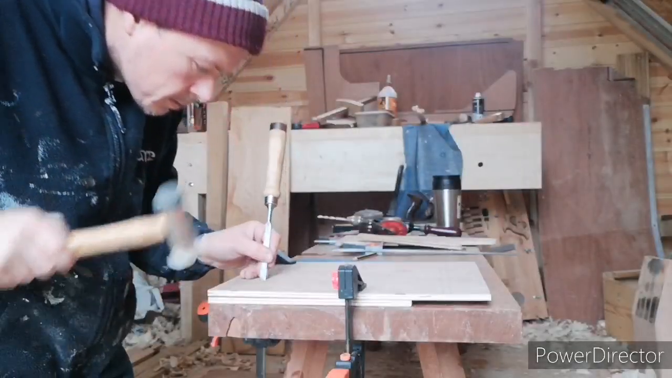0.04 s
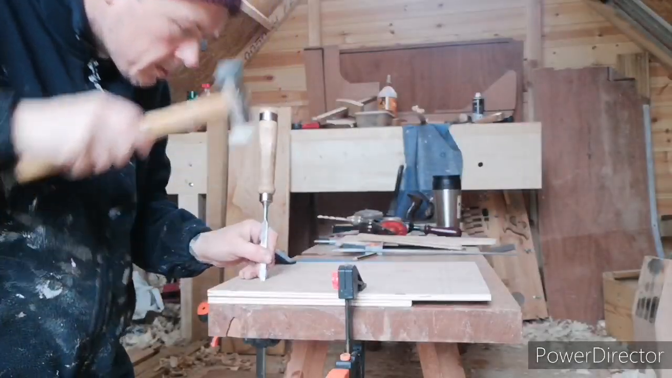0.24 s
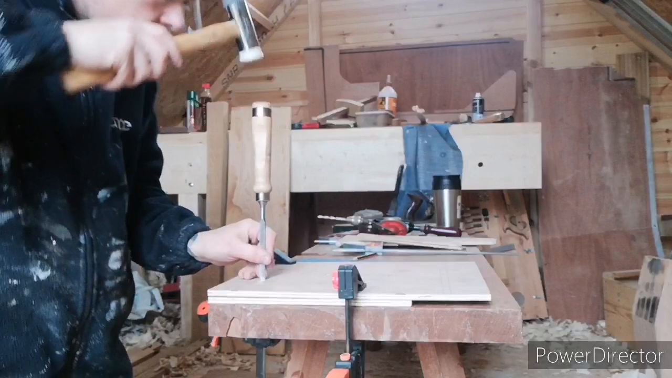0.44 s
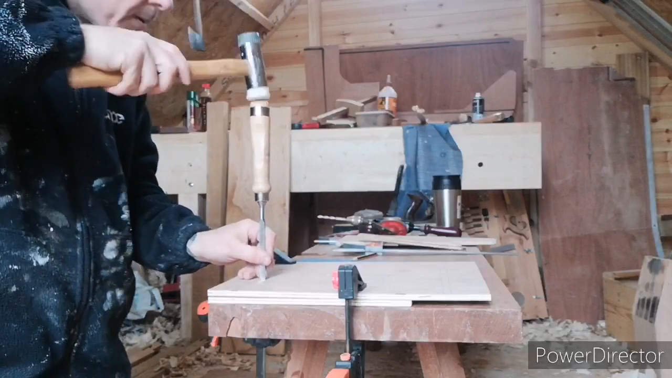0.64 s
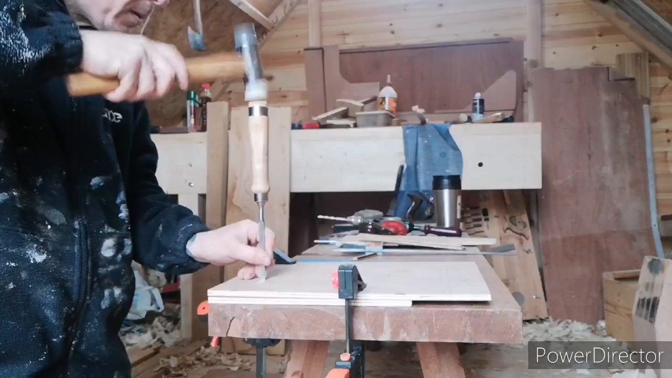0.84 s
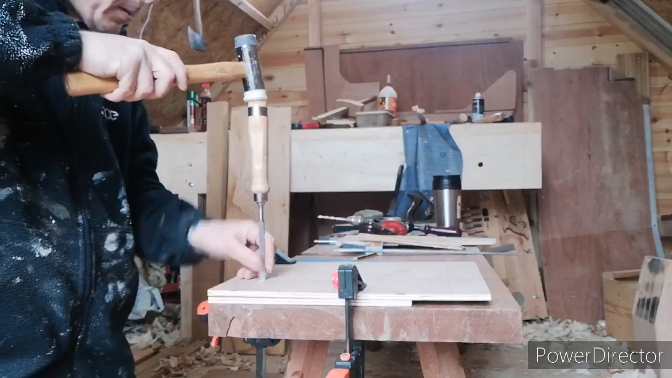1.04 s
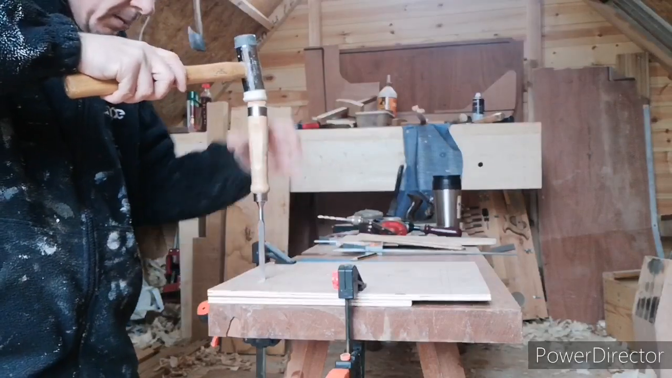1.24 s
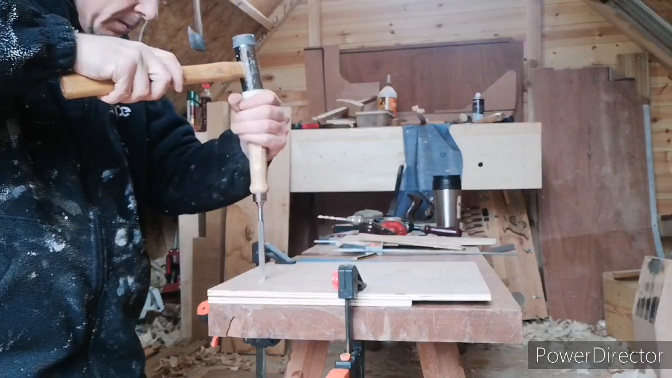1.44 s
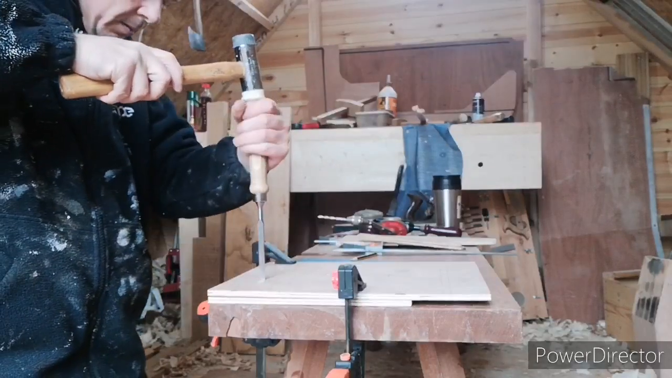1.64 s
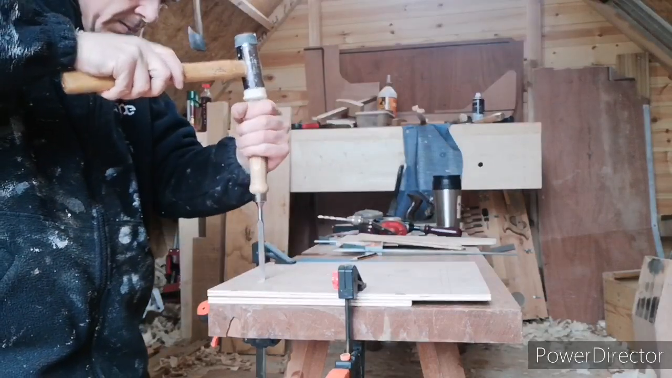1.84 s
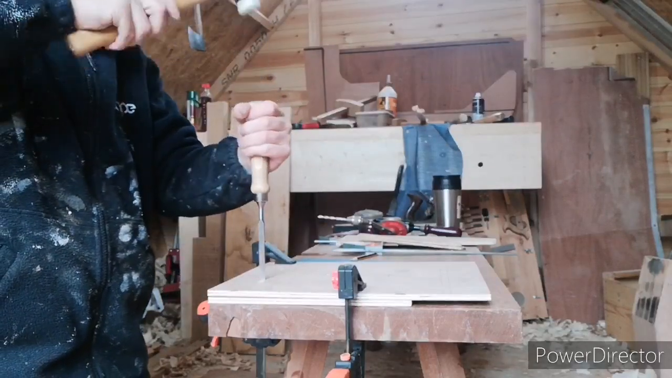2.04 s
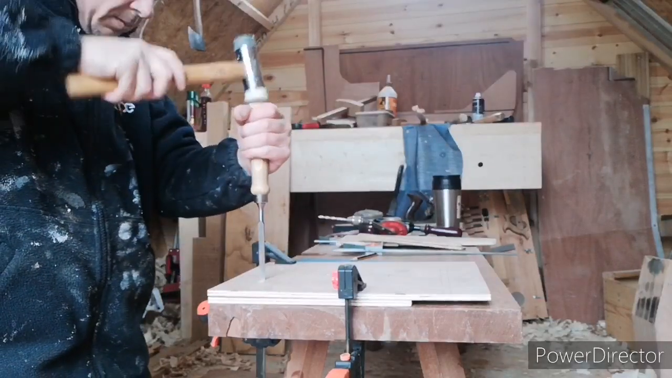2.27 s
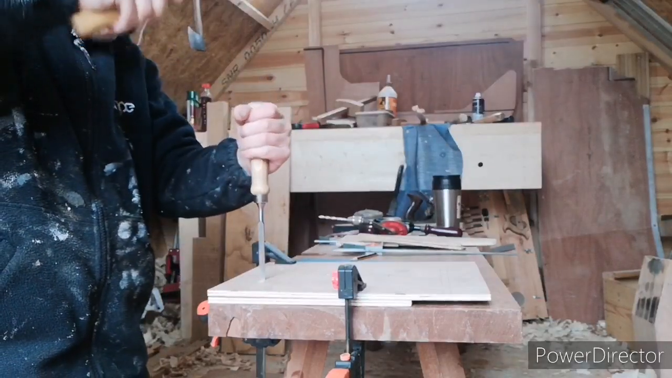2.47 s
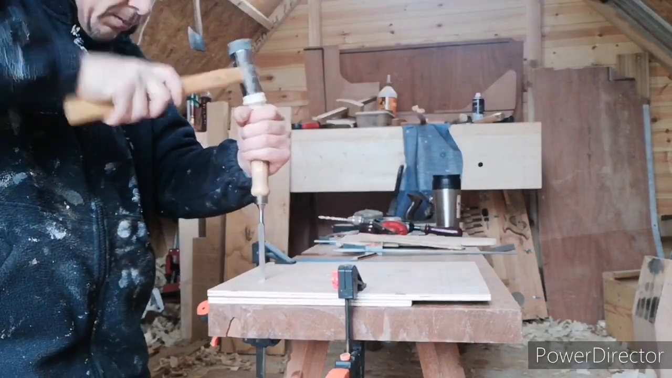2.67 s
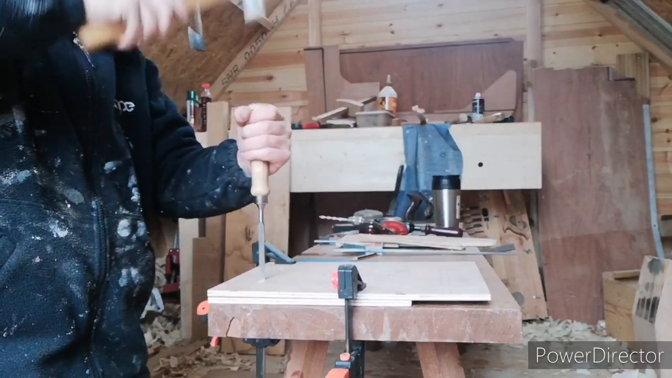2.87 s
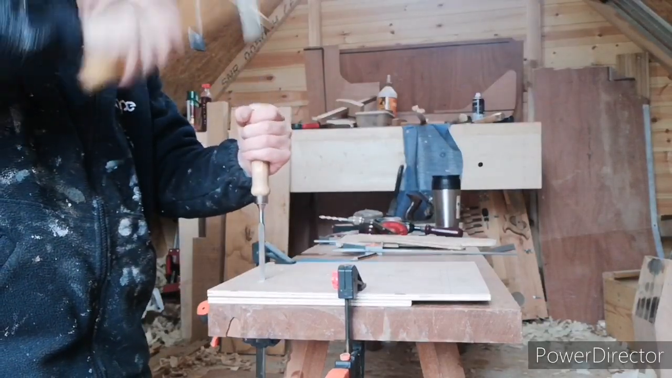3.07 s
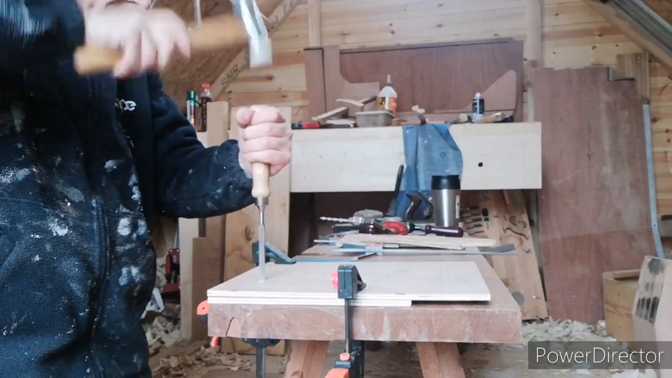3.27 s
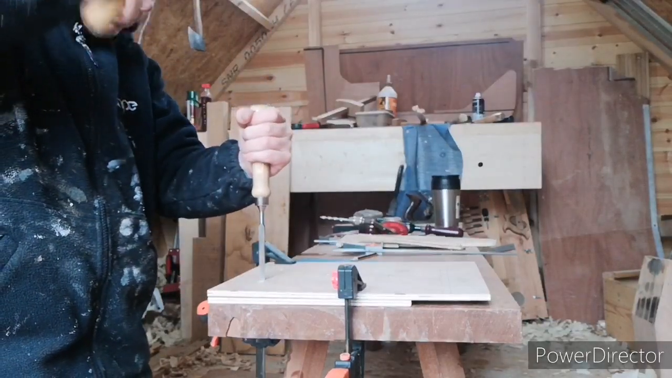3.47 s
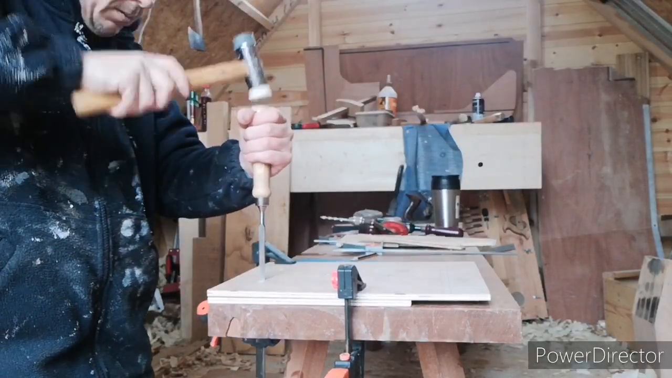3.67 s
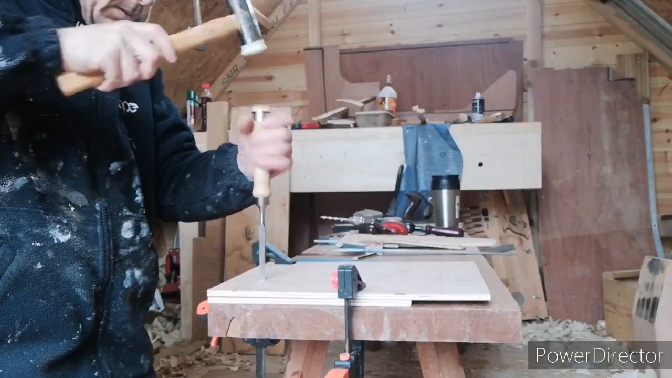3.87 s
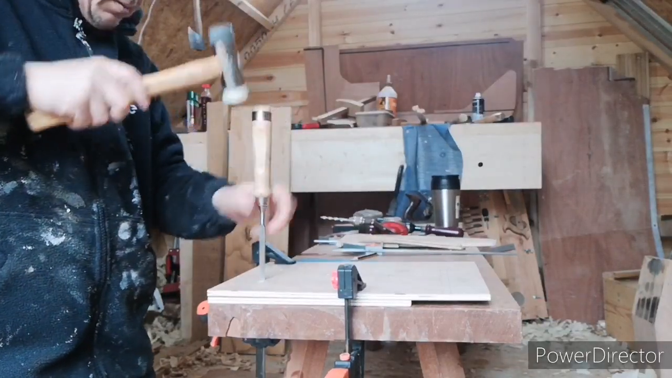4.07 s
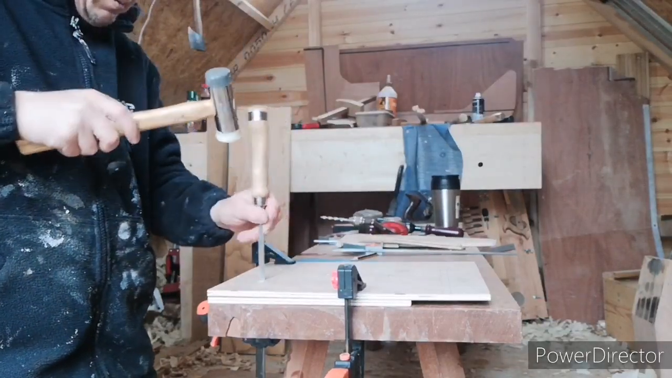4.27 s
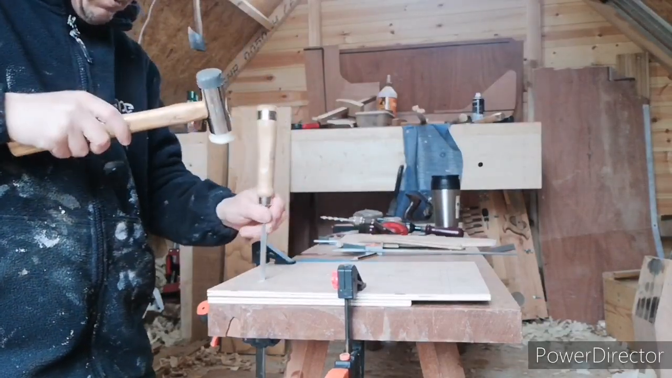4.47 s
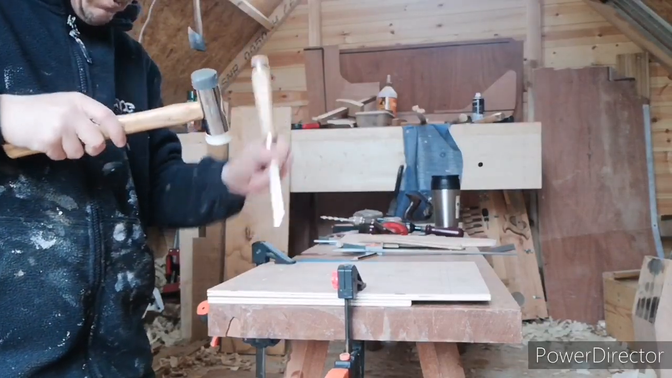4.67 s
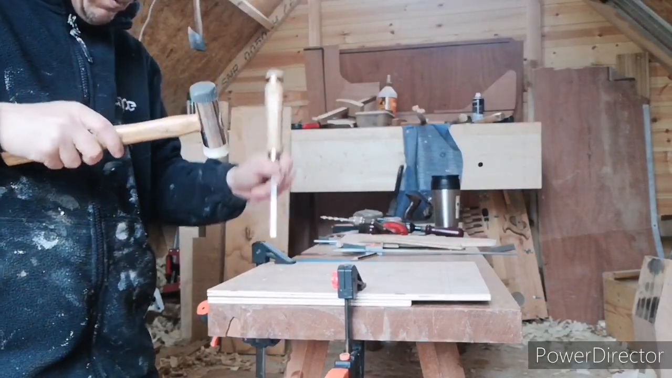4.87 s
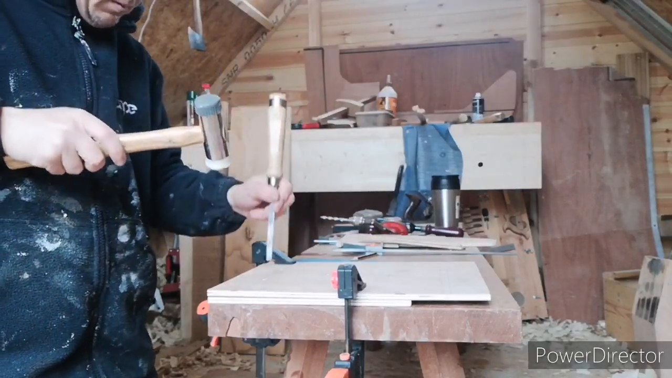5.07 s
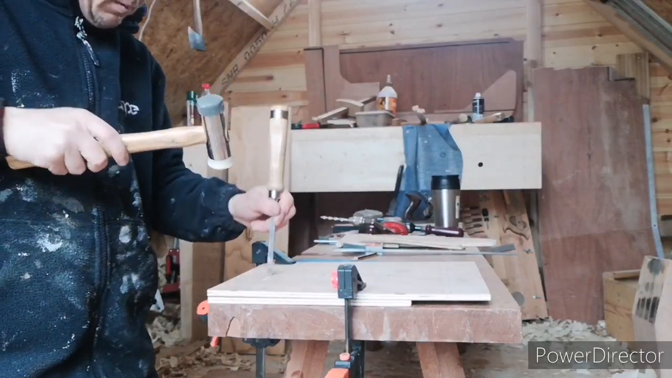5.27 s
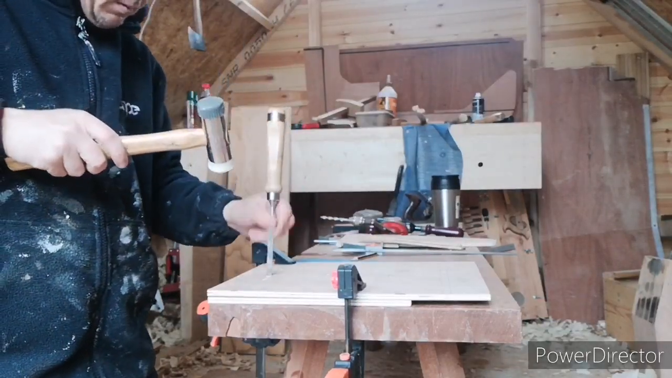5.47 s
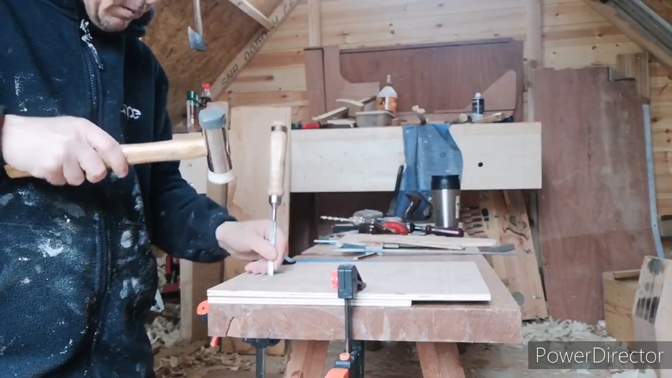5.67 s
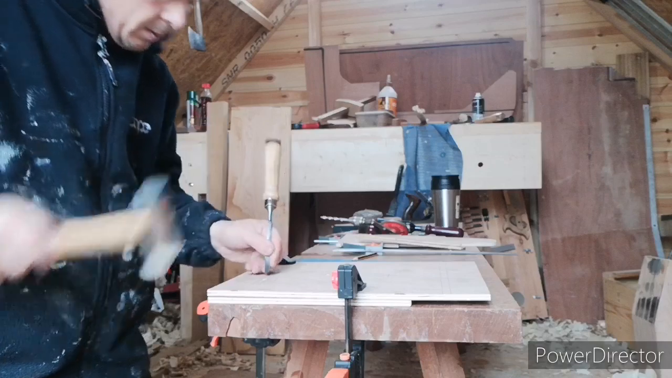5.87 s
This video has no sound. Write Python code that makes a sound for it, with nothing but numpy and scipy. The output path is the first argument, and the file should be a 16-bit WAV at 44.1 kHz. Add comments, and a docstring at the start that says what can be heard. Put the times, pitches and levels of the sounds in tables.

```python
"""A chisel is driven into plywood clamped on a workshop bench, over faint room tone. Two light mallet blows set
the edge near 1 s; four heavy ones follow from 2.3 to 3.8 s. Each cracks in the handle, thumps the bench and
fills the room; loose steel chatters after two of the heavy ones. From 4.5 s the chisel is levered out with a
creak that falls in pitch, then set down: the edge scuffs, the tip bumps twice. Throughout, peaks are limited
and the room's tails are turned down."""
import sys
import numpy as np
from scipy import signal
from scipy.fft import rfft, irfft, next_fast_len
from scipy.io import wavfile
from scipy.ndimage import uniform_filter1d, minimum_filter1d, map_coordinates

SR = 44100
rng = np.random.default_rng(int(sys.argv[2]) if len(sys.argv) > 2 else 0)


def wav_record(signal):
    """Record a signal, one row per channel, as 16-bit PCM in the file named by sys.argv[1]."""
    frames = np.transpose(np.atleast_2d(signal))
    bounded = np.clip(frames, -1, 1)
    # unit amplitude maps onto the largest positive 16-bit level
    quanta = np.round(bounded * 32767).astype(np.int16)
    wavfile.write(sys.argv[1], SR, quanta)


N = 261072
T = np.arange(SR) / SR  # time since a contact, s

# spectrum of the crack, with a fizz of distortion at 11-15 kHz: freq_hz, density_db
CRACK_AND_FIZZ = [(25, -7), (60, -4), (140, 2), (330, -3.5), (540, -13), (740, -6.5), (1700, 0), (3100, -4),
                  (4200, -8), (5500, -20.5), (7300, -37), (9700, -54.5), (11500, -58.5), (15000, -43.5)]


def blows():
    """Mallet hits chisel, chisel drives bench. A biting edge cracks brighter and thumps softer, duller."""
    # mallet blows: start_s, force_db, bite (-1 to 1), favoured_hz
    strikes = [(0.8282, -21.5, -0.26, 1314), (1.0495, -15.5, -0.28, 1477), (2.3446, -9.5, 1.0, 1811),
               (2.8317, -6, -.2, 2200), (3.2918, -6, 0.57, 2847), (3.7817, -6, -0.37, 5220)]
    out = np.zeros(N)
    usual_room = room_tail(hold_s=0.012)
    for start_s, force_db, bite, favoured_hz in strikes:
        re_full_db = force_db + 6  # full force is -6 dB
        bright_db_per_oct = -0.5 + 0.085 * re_full_db + 1.83 * bite
        pitch_ratio = 1 + 0.003 * re_full_db
        handle_share = np.clip(0.83 + 0.025 * re_full_db, 0, 1)
        chisel = crack(bright_db_per_oct, pitch_ratio, handle_share, usual_room)
        chisel += handle_share * (wood() + knock(pitch_ratio))
        favoured_db = -11.5 + 0.92 * along(CRACK_AND_FIZZ, favoured_hz)
        favoured = amp(favoured_db) * ring(favoured_hz, t60_s=0.26, waver=0.95)
        add(out, start_s, amp(force_db) * (amp(-5) * chisel + favoured))
        thump_db = -10.5 + 0.64 * re_full_db - 1.5 * bite
        tilt_db_per_oct = -0.5 + 0.21 * re_full_db - 2.5 * bite
        add(out, start_s, amp(thump_db) * thump(tilt_db_per_oct, scatter_db=0.5))
        jolt_db = 2 * force_db - 51  # negligible for light blows
        add(out, start_s, amp(jolt_db) * steel(t60_s=0.85))
    return out


def crack(bright_db_per_oct, pitch_ratio, handle_share, usual_room):
    """A sharp contact and its reflections, coloured by the handle, with a distortion-like fizz on top."""
    # resonances of handle and chisel: centre_hz, width_hz, boost_db
    handle_modes = [(976, 23, 5.5), (1310, 64, 0.5), (1660, 310, 2.5), (2230, 290, 6.5), (3000, 280, 3),
                    (3800, 360, 3.5), (4264, 110, -1.5), (5394, 340, 4.5)]

    def spectrum_db(hz):
        peaks_db = sum(boost_db / (1 + (2 * (hz - pitch_ratio * centre_hz) / width_hz) ** 2)
                       for centre_hz, width_hz, boost_db in handle_modes)
        tilt_db = bright_db_per_oct * np.log2(np.clip(hz, 800, 12000) / 800)
        return along(CRACK_AND_FIZZ, hz) + handle_share * peaks_db + tilt_db

    contact = amp(2.5) * rng.standard_normal(SR) * fade(t60_s=0.013)
    # half the reflections stay alike, half change as the worker moves
    reflections = (usual_room + room_tail(hold_s=0.0048)) / np.sqrt(2)
    bunching = amp(1.7 * drift(rate_hz=250))
    return coloured(contact + reflections * bunching * swell(rise_s=0.0034), spectrum_db)


def knock(pitch_ratio):
    """A few cycles of the handle, heard directly and off the nearest surfaces."""
    # direct sound and first returns: delay_s, centre_hz, level_db
    paths = [(.0003, 3042, 8.5), (.0008, 1291, 0.5), (.0075, 2700, 3), (0.0164, 2099, 7), (.025, 2900, 0.5),
             (.048, 1858, 0.5)]
    out = np.zeros(SR)
    for delay_s, centre_hz, level_db in paths:
        hz = centre_hz * pitch_ratio * (1 + 0.036 * rng.normal())
        burst = swing(hz, peak_s=0.00066, steepness=1.1)
        add(out, delay_s + 0.00067 * rng.random(), amp(level_db + 0.5 * rng.normal()) * burst)
    return out


def wood():
    """Each blow shares its energy differently among the wooden resonances."""
    # narrow modes of chisel and board, held up by the room: pitch_hz, relative_db
    wood_modes = [(1071, -3.5), (1305, -5.5), (1400, -8), (1648, 0.5), (1723, -3), (1790, 1), (1863, 0.5),
                  (2085, -4), (2215, -8), (2272, -2.5), (2353, -1.5), (2683, -3.5), (2991, -4),
                  (3119, -5.5), (3564, -7)]
    return sum(amp(db - 14.5 + 2.4 * rng.normal()) * ring(hz, t60_s=0.33, waver=0.27)
               for hz, db in wood_modes)


def thump(tilt_db_per_oct, scatter_db):
    """The bench top dips and recoils, then the low modes swell and ring."""
    # low modes of bench and room: pitch_hz, relative_db, t60_s, rise_s
    bench_modes = [(58.73, -8, 0.5, 0.18), (98.5, -12.5, 0.43, 0.019), (116.4, 7.5, 0.36, 0.13),
                   (144.2, -7.5, 0.43, 0.043), (187.1, -11, 0.45, 0.093), (206.3, 10, .29, 0.2),
                   (230.5, -7.5, 0.31, 0.082), (280, -7, .32, 0.0053), (331.7, -14, .38, 0.012),
                   (374, -23.5, 0.14, 0.017), (448.5, -19, 0.2, .013)]
    out = -swing(hz=136, peak_s=0.016, steepness=2.4)
    for k, (hz, db, t60_s, rise_s) in enumerate(bench_modes):
        gain = amp(db + tilt_db_per_oct * np.log2(hz / 130) + scatter_db * rng.normal())
        out += (-1) ** k * gain * np.sin(2 * np.pi * hz * T) * fade(t60_s) * swell(rise_s)
    return out


def steel(t60_s):
    """Loose steel tools on the bench ring when jolted."""
    # tool modes: pitch_hz, relative_db
    steel_modes = [(2118, 0.5), (2622, -5.5), (2818, -1), (3074, 0), (3831, 2.5), (4070, -5.5), (4274, -7),
                   (4797, -6.5), (5286, -9.5)]
    return sum(amp(db + 2.5 * rng.normal()) * ring(hz, t60_s, waver=1.2) for hz, db in steel_modes)


def rattles(bounces=4, gap_s=0.016, loss_db=2):
    """A jolted tool drops back in quick, damped chinks, each with a dull tick."""
    # chatter of loose steel: start_s, level_db
    chatters = [(3.078, -56.5), (4.037, -62)]
    out = np.zeros(N)
    for start_s, level_db in chatters:
        for bounce in range(bounces):
            tick = band(rng.standard_normal(SR) * fade(t60_s=0.16), centre_hz=2680, half_width_oct=0.48)
            chink = amp(-13) * steel(t60_s=0.1576)
            bounce_s = start_s + gap_s * (bounce + 0.5 * rng.random())
            add(out, bounce_s, amp(level_db - loss_db * bounce) * (tick + chink))
    return out


def tip_bumps():
    """The tip gently thumps the bench as the chisel comes free and is set down."""
    # tip contacts: start_s, level_db
    bumps = [(4.721, -54.5), (5.497, -44)]
    out = np.zeros(N)
    for start_s, level_db in bumps:
        add(out, start_s, amp(level_db) * thump(tilt_db_per_oct=-2, scatter_db=2))
    return out


def dull_creaks():
    """Dull creaks and knocks; near 4.55-4.65 s they fall in pitch as the chisel is levered out of the wood."""
    # dull contacts: start_s, level_db, centre_hz
    thuds = [(3.591, -78, 330), (4.553, -64, 490), (4.565, -69.5, 900), (4.654, -60, 230),
             (5.019, -66, 280)]
    return touches(thuds, rise_s=0.0023, hold_s=0.022, half_width_oct=0.35)


def edge_scuffs():
    """The edge scuffs the plywood."""
    # light scrapes: start_s, level_db, centre_hz
    scuffs = [(2.119, -77, 3260), (4.555, -76.5, 2300), (4.714, -75, 3710), (4.91, -89, 4104),
              (5.131, -84.5, 3900), (5.492, -69.5, 2330), (5.729, -77.5, 2965)]
    return touches(scuffs, rise_s=0.0028, hold_s=0.019, half_width_oct=0.32)


def touches(contacts, rise_s, hold_s, half_width_oct):
    """Soft contacts: each swells in one noise band and dies away in the room."""
    out = np.zeros(N)
    for start_s, level_db, centre_hz in contacts:
        rub = room_tail(hold_s) * swell(rise_s)
        add(out, start_s, amp(level_db) * band(rub, centre_hz, half_width_oct))
    return out


def room_tail(hold_s):
    """Dense reflections: level for hold_s, then each frequency dies at its own rate."""
    # room decay: freq_hz, t60_s
    decay_times = [(60, 0.7), (160, 0.45), (420, .38), (1100, 0.34), (2900, 0.26), (6000, 0.28),
                   (12000, .16)]
    hz, time_s, noise = signal.stft(rng.standard_normal(SR), SR, nperseg=256)
    fall_db = -60 * np.maximum(time_s - hold_s, 0) / along(decay_times, hz)[:, None]
    return signal.istft(noise * amp(fall_db), SR, nperseg=256)[1][:SR]


def room_tone():
    """Faint rumble and hiss of a quiet workshop."""
    # background spectrum: freq_hz, density_db
    air = [(12, -37.5), (20, -3.5), (53, 4), (81, -17.5), (127, 0.5), (182, -17.5), (228, -13), (624, -29),
           (825, -23.5), (2670, -27.5), (3070, -30), (14300, -55), (16000, -55)]
    return amp(-66.5) * unit(coloured(rng.standard_normal(N), lambda hz: along(air, hz)))


def ring(hz, t60_s, waver):
    """A struck mode whose strength and phase drift as reflections join it."""
    phase = 2 * np.pi * (hz * T + rng.random())
    tone = (1 + waver * drift(rate_hz=37)) * np.sin(phase) + waver * drift(rate_hz=29) * np.cos(phase)
    return tone * fade(t60_s) * swell(rise_s=0.0027)


def swing(hz, peak_s, steepness):
    """A few cycles under an envelope that crests at peak_s."""
    age = T / peak_s
    return np.sin(2 * np.pi * hz * T) * (age * np.exp(1 - age)) ** steepness


def swell(rise_s):
    """Exponential rise to 1."""
    return 1 - np.exp(-T / rise_s)


def fade(t60_s):
    """Exponential decay, 60 dB in t60_s."""
    return np.exp(-np.log(1000) * T / t60_s)


def drift(rate_hz):
    """Smooth random curve, 1 s long."""
    return map_coordinates(rng.standard_normal(512), [T * rate_hz], mode="mirror")


def band(x, centre_hz, half_width_oct):
    """Broad band-pass, 3 dB down at half_width_oct from its centre."""
    return coloured(x, lambda hz: np.maximum(-3 * (np.log2((hz + 1) / centre_hz) / half_width_oct) ** 2,
                                             -70))


def coloured(x, spectrum_db):
    """Minimum-phase filter of unit power, shaped by spectrum_db(hz)."""
    size = 2 * next_fast_len(len(x))
    gain = unit(amp(spectrum_db(np.fft.rfftfreq(size, 1 / SR))))
    cepstrum = irfft(np.log(np.maximum(gain, 1e-6)))
    cepstrum[1:size // 2] *= 2
    cepstrum[size // 2 + 1:] = 0
    return irfft(rfft(x, size) * np.exp(rfft(cepstrum)), size)[:len(x)]


def along(points, hz):
    """Interpolate (freq_hz, value) points on a log frequency axis."""
    knots_hz, values = np.transpose(points)
    return np.interp(np.log(hz + 1), np.log(knots_hz + 1), values)


def amp(db):
    """Decibels to gain."""
    return 10 ** (np.asarray(db) / 20)


def unit(x):
    """Scale to rms 1."""
    return x / np.sqrt(np.mean(x ** 2) + 1e-20)


def add(track, start_s, sound):
    """Mix a sound into the track."""
    part = track[round(start_s * SR):][:len(sound)]
    part += sound[:len(part)]


def suppressor(x, depth_db, hold_s, below_db=29.5, ramp_db=14):
    """Turns the sound down once it falls far below its latest peak."""
    level_db = 10 * np.log10(np.abs(uniform_filter1d(x ** 2, size=1500)) + 1e-12)
    span = 2 * int(hold_s * SR / 2) + 1
    peak_db = -minimum_filter1d(-level_db, span, origin=span // 2)
    closed = np.clip((peak_db - level_db - below_db) / ramp_db, 0, 1)
    return x * amp(-depth_db * uniform_filter1d(closed, size=1000))


def limiter(x):
    """Smooth gain dips keep peaks within full scale."""
    needed_gain = 1 / np.maximum(np.abs(x), 1)
    held_gain = minimum_filter1d(needed_gain, size=129)
    return x * uniform_filter1d(uniform_filter1d(held_gain, size=65), size=65)


def scene():
    """All sources, mono."""
    handling = dull_creaks() + edge_scuffs()
    return (blows() + rattles() + tip_bumps() + handling + room_tone())[None]


def record(dry, split_hz=380, top_hz=15500):
    """Tails turned down in bass and treble separately, then peak limiting and a steep low-pass."""
    bass = signal.sosfiltfilt(signal.butter(3, split_hz, fs=SR, output="sos"), dry)
    treble = dry - bass
    quieted = suppressor(bass, depth_db=6.5, hold_s=0.37) + suppressor(treble, depth_db=5, hold_s=0.29)
    low_pass = signal.ellip(10, 0.1, 110, top_hz, fs=SR, output="sos")
    return signal.sosfilt(low_pass, limiter(quieted))


dry = scene()
out = record(dry)
wav_record(out)
```